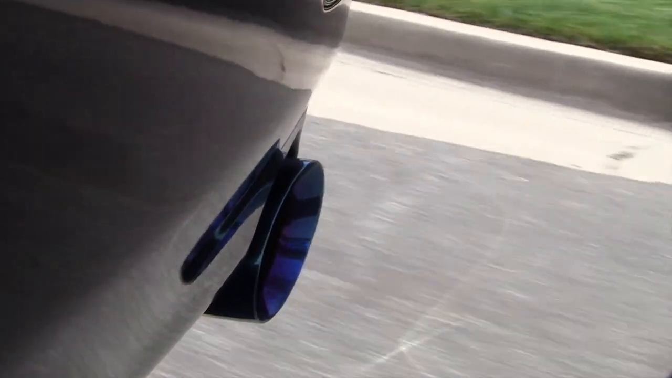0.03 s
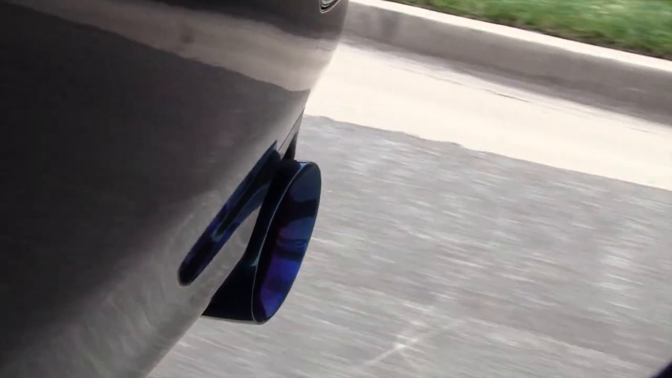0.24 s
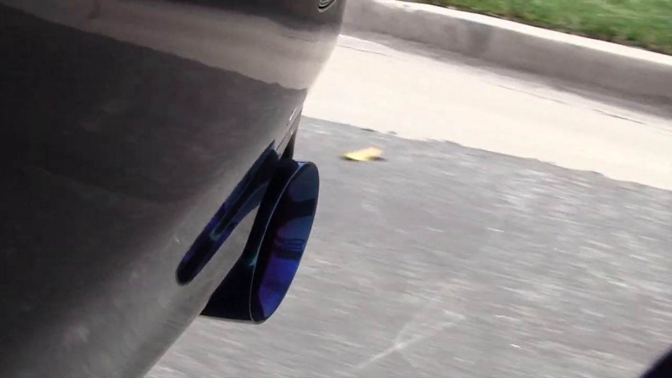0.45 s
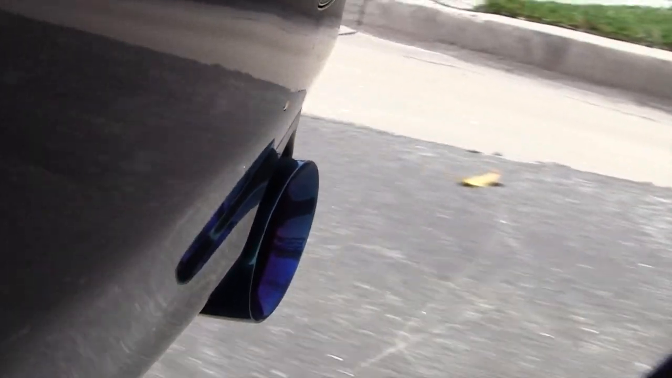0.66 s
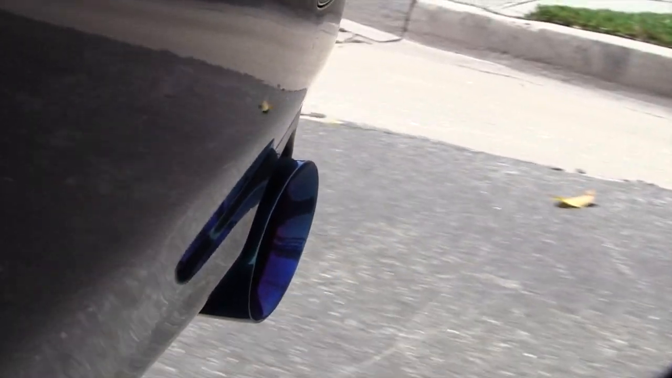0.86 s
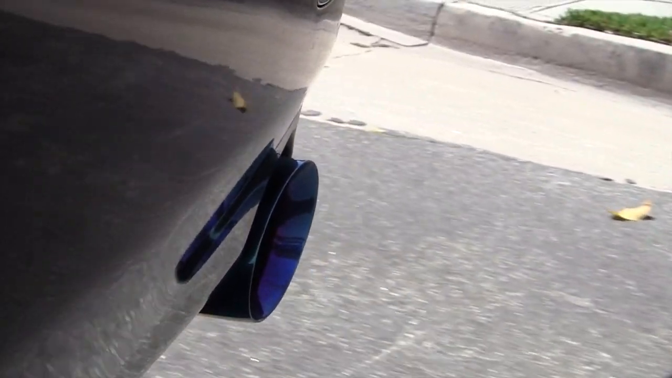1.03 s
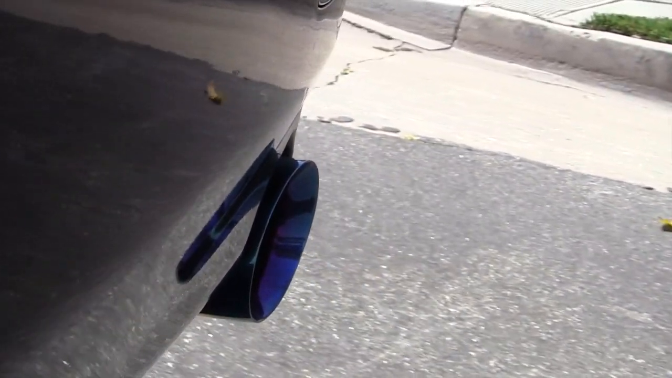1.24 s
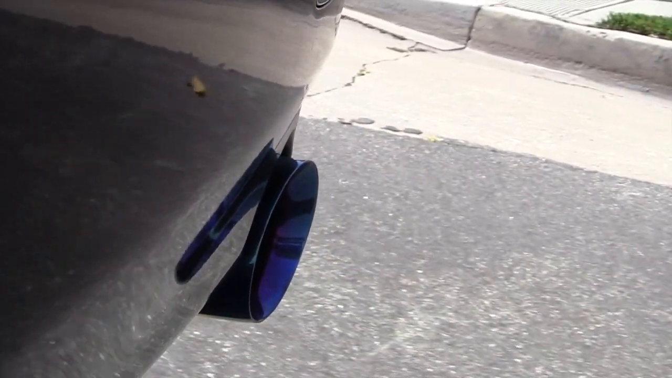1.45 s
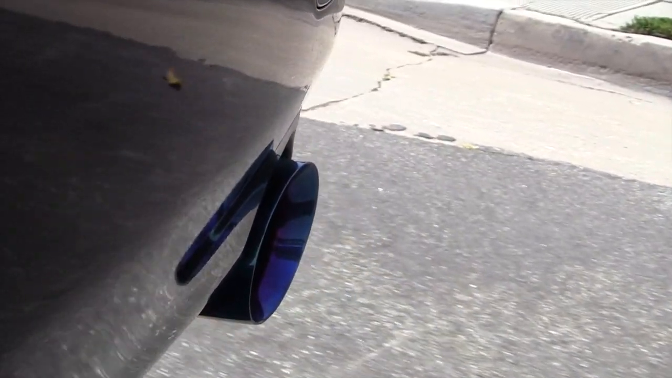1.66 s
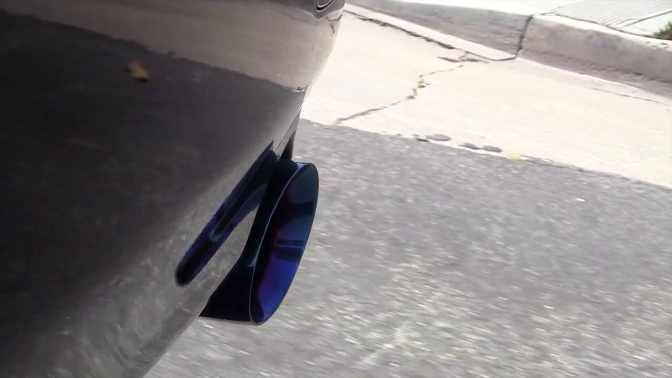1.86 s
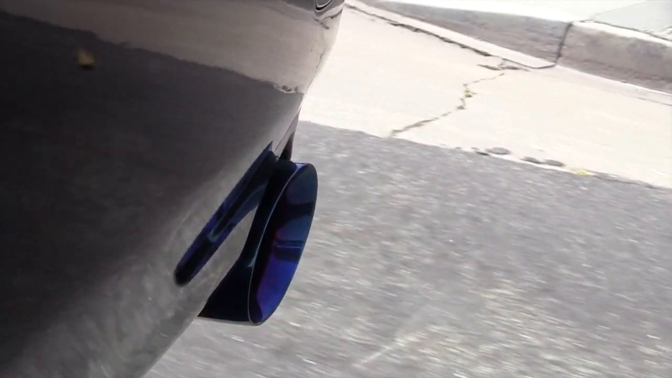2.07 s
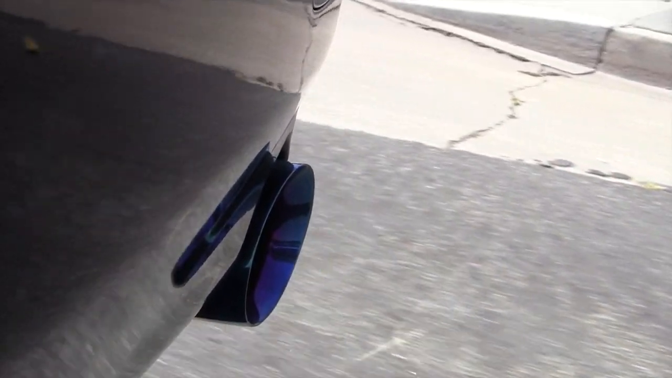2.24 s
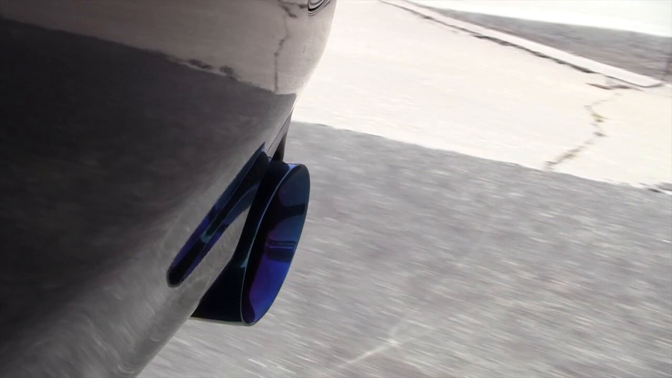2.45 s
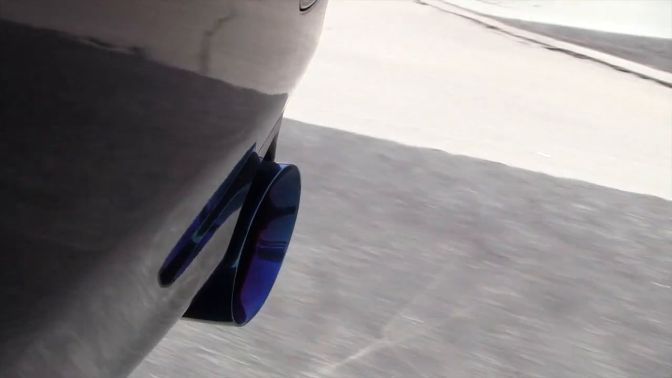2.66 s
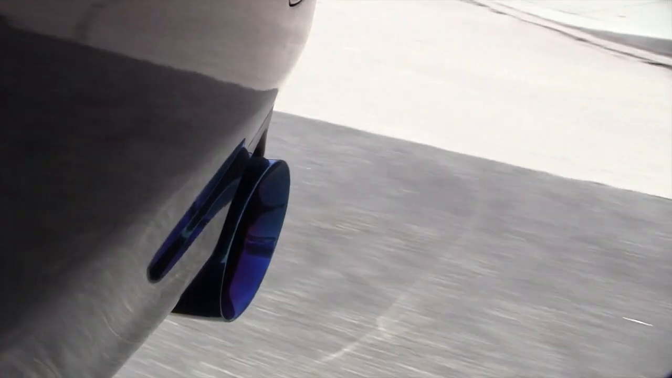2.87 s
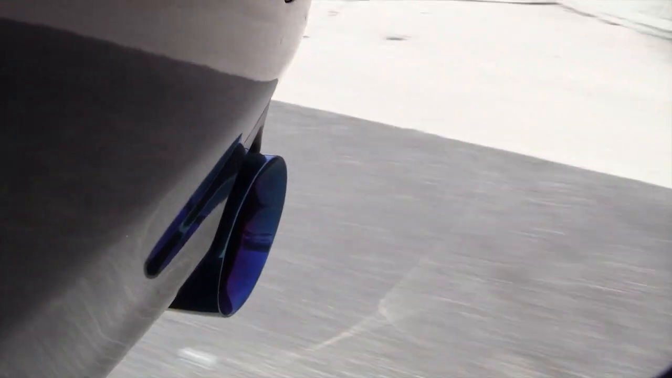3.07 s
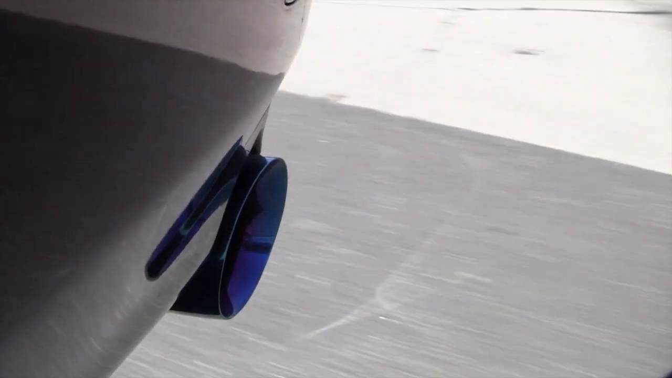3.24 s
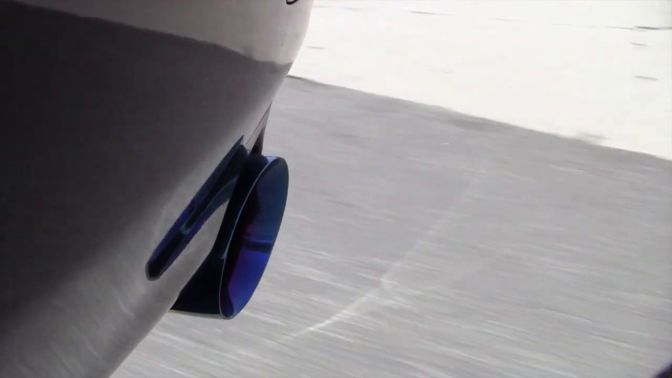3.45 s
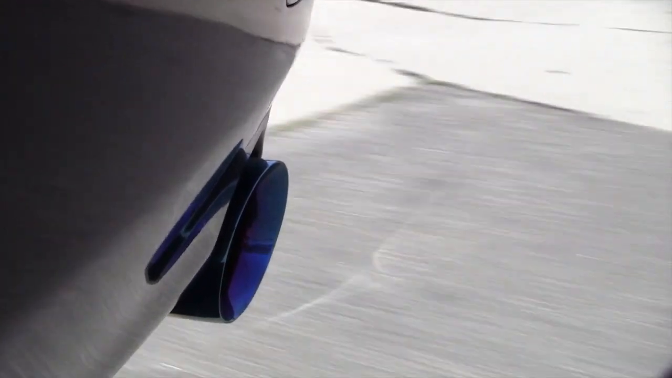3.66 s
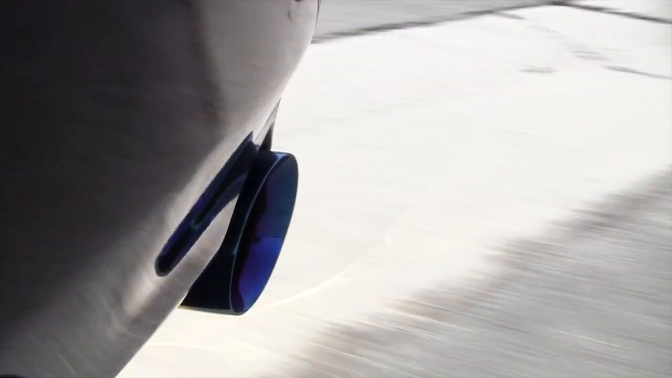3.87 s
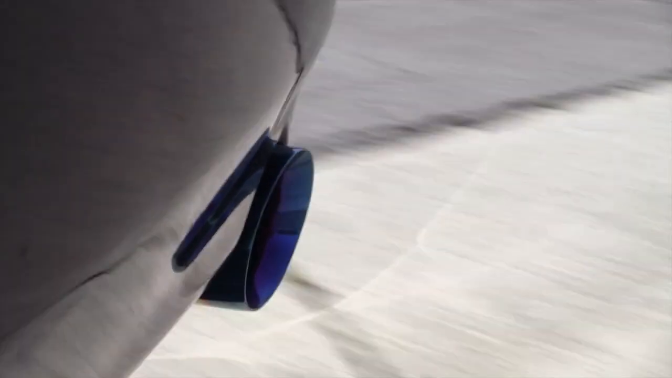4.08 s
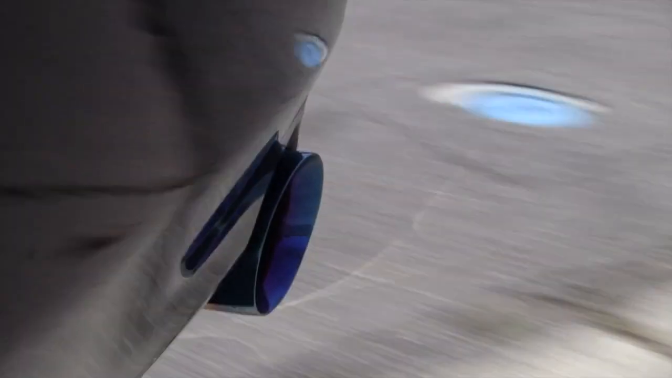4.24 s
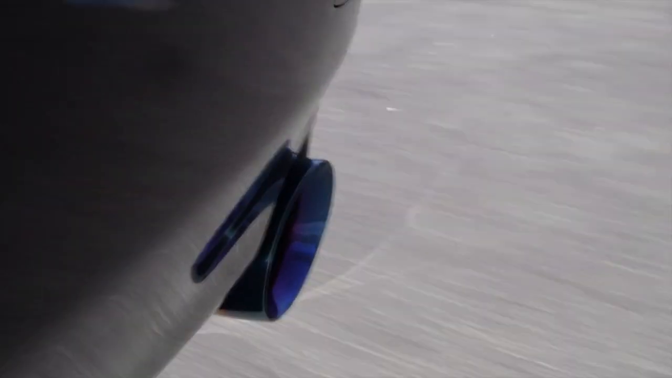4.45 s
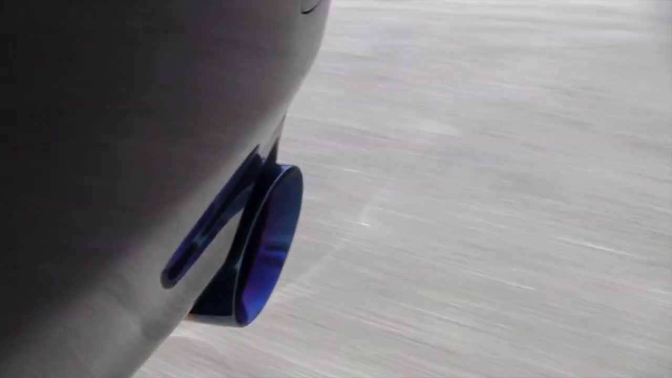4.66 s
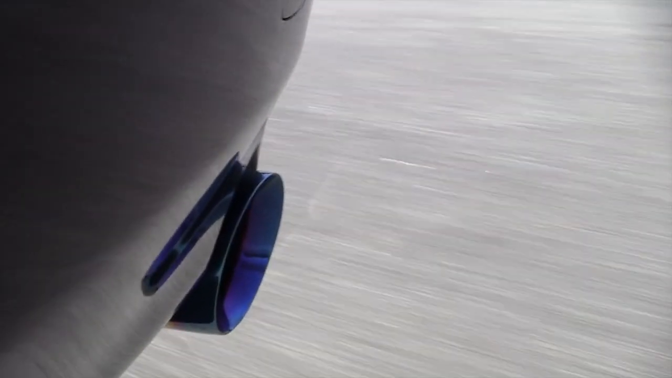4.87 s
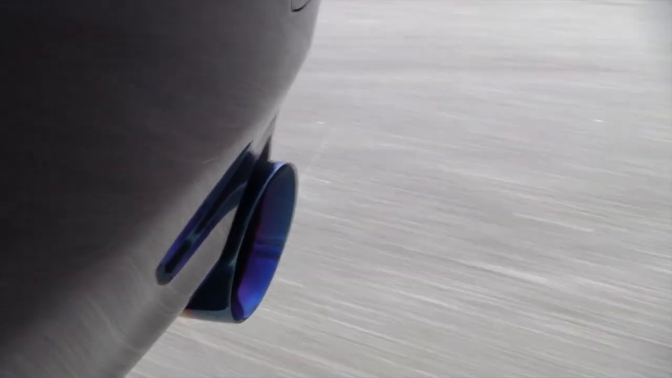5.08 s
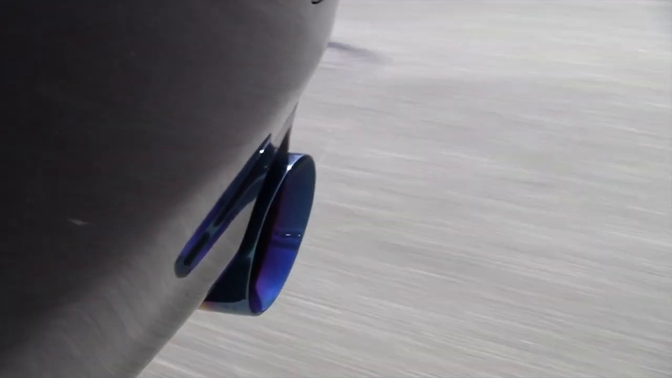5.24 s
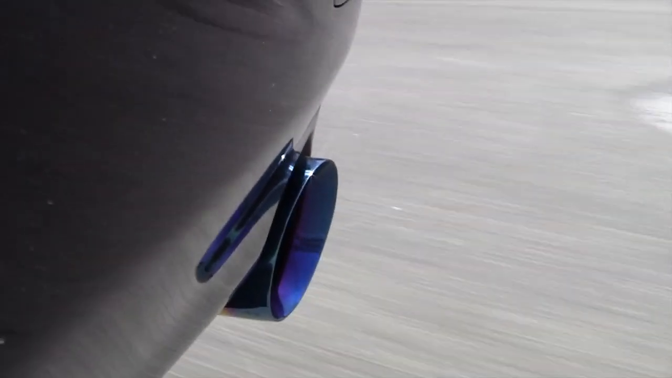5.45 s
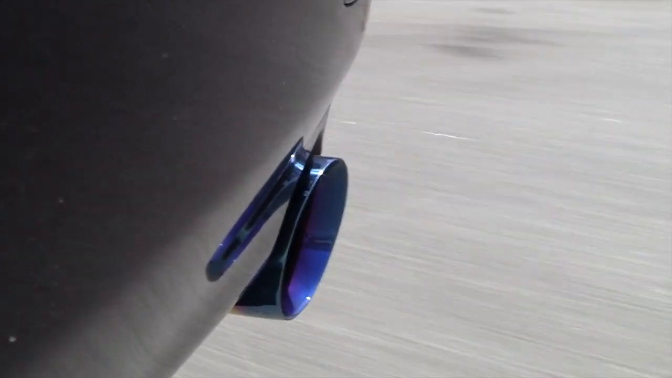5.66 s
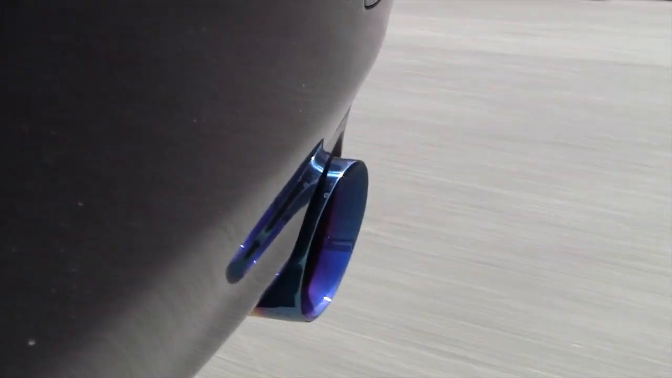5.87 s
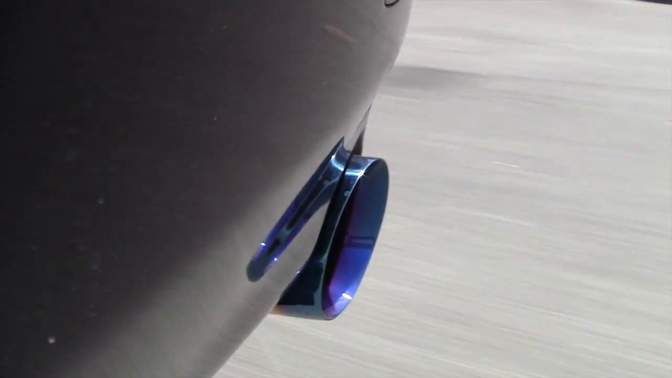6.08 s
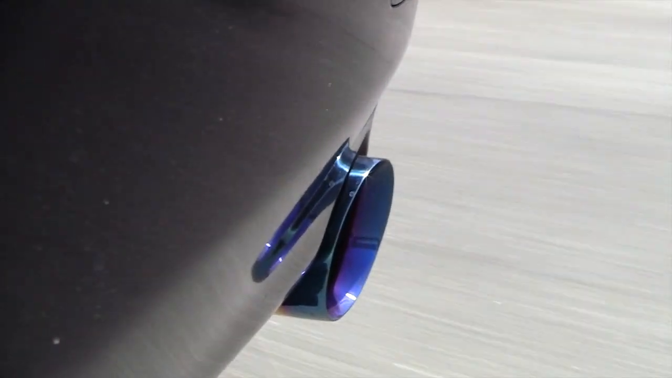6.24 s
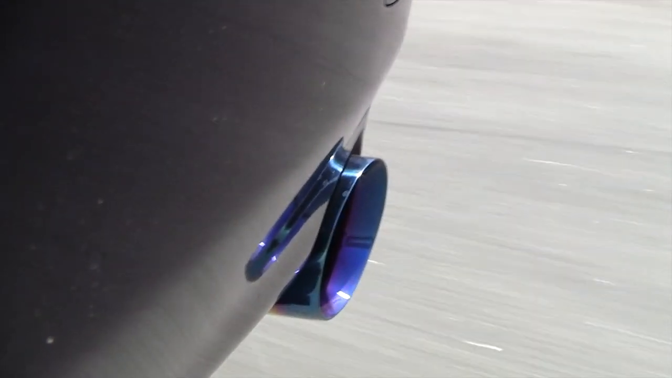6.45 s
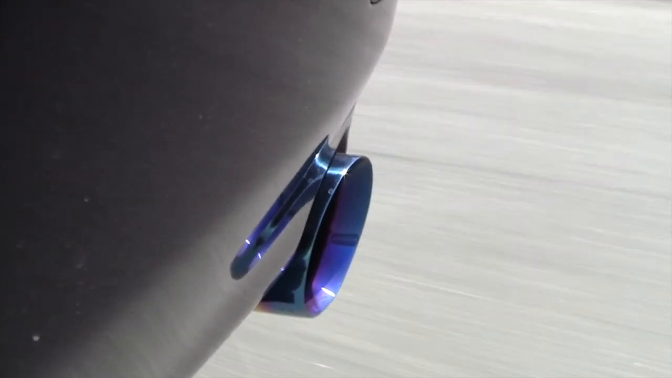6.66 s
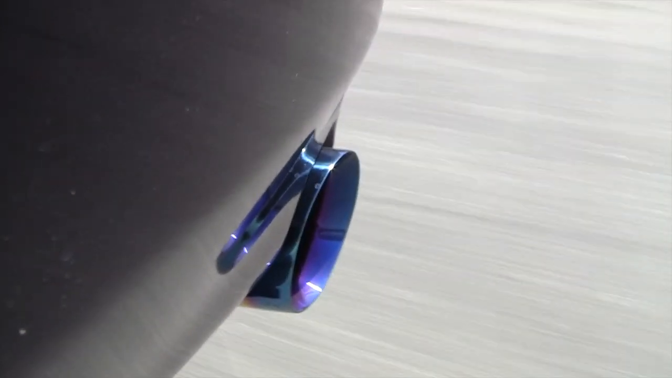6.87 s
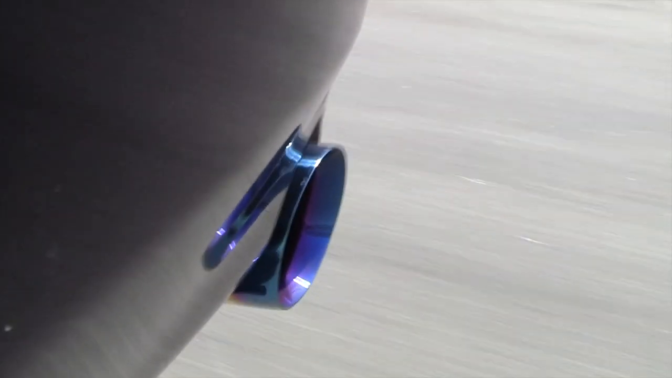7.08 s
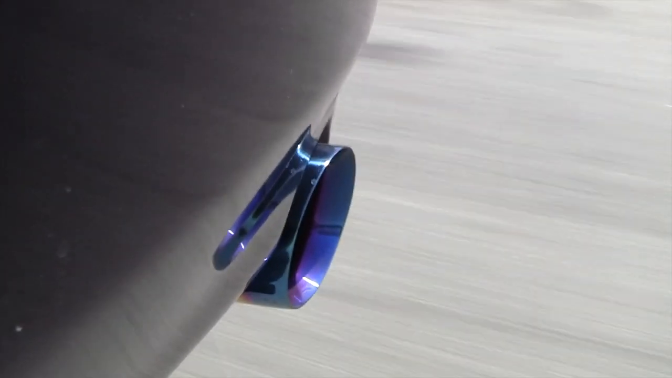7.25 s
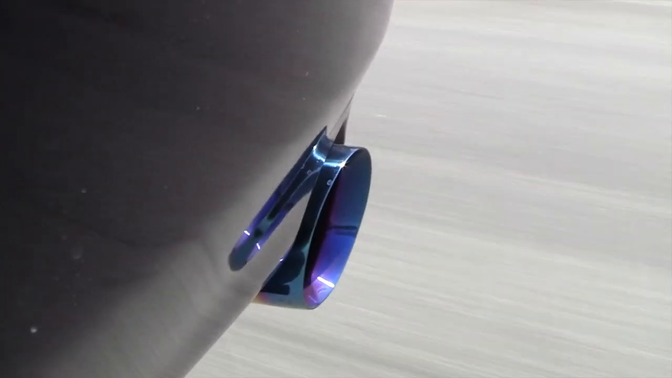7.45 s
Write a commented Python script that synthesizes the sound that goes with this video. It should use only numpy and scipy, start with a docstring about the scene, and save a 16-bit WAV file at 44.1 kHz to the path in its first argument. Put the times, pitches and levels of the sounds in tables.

```python
"""A V6 car on a street, heard from a microphone mounted right beside the tailpipe.
It coasts at first, a faint hum, a wheel ring and one squeak over the low throb of the exhaust.
From two seconds it pulls away hard: firings boom through the muffler and gas rushes from the tip.
Grit crunches under the tyres, and around four seconds they knock twice over a concrete gutter.
The tyre roar grows to the end, and the pipe rasps louder and more unevenly as the revs climb."""
import sys
import numpy as np
from scipy import signal
from scipy.io import wavfile
from scipy.ndimage import uniform_filter1d

SR = 44100
rng = np.random.default_rng(int(sys.argv[2]) if len(sys.argv) > 2 else 0)


def digitize_waveform(pressure):
    """Quantize a signal to 16-bit integers and store it at the path in sys.argv[1].

    Rows of a 2-D input are taken as channels; values are limited to [-1, 1].
    """
    field = np.atleast_2d(pressure).T
    bounded = np.clip(field, -1, 1)
    quanta = np.round(bounded * 32767).astype(np.int16)
    wavfile.write(sys.argv[1], SR, quanta)


N = 331191
TIME = np.arange(N) / SR

# The six cylinders in firing order. Each entry: relative strength in dB, scaled by the imbalance.
CYLINDERS_DB = [5, -3, -4, -5, 0, 7]


def from_db(db):
    """Decibels to gain."""
    return 10 ** (np.asarray(db) / 20)


def rms_one(x):
    """Scale to unit power."""
    return x / np.sqrt(np.mean(x ** 2) + 1e-20)


def in_time(rows):
    """Each column of a curve at every sample."""
    s, *columns = np.transpose(rows)
    return [np.interp(TIME, s, c) for c in columns]


def by_revs(rows, rate):
    """Read a curve at the given firing rate."""
    return np.interp(rate, *np.transpose(rows))


def at_hz(points, hz):
    """Read a spectrum on a log-frequency axis."""
    points_hz, db = np.transpose(points)
    return np.interp(np.log(hz), np.log(points_hz), db)


def swell(s, length_s):
    """A smooth rise and fall around one moment."""
    return np.exp(-.5 * np.minimum(((TIME - s) / length_s) ** 2, 100))


def drift(per_s):
    """A random wander, gliding to a new value per_s times a second."""
    knots = rng.standard_normal(4096)
    return np.interp(TIME * per_s, np.arange(len(knots)), knots)


def cut(x, hz, kind, order=2):
    """Butterworth filter."""
    sections = signal.butter(order, np.clip(hz, 10, .45 * SR), kind, fs=SR, output="sos")
    return signal.sosfilt(sections, x)


def resonate(x, hz, width_hz):
    """One resonance with gain 1 at its peak."""
    r = np.exp(-np.pi * width_hz / SR)
    feedback = [1, -2 * r * np.cos(2 * np.pi * hz / SR), r * r]
    return signal.lfilter(np.array([1, 0, -1]) * (1 - r * r) / 2, feedback, x + 1e-18)


def narrow_noise(hz, width_hz):
    """A wavering tone: noise twice through one resonance; rms 1."""
    return rms_one(resonate(resonate(rng.standard_normal(N), hz, width_hz), hz, width_hz))


def stereo_noise(spectrum, flicker_db):
    """Bands of noise, each with its own level, flicker, width and lean; rms 1 in the middle."""
    # Stereo width. Each row: frequency in Hz, side minus mid in dB.
    width = [(60, -8.5), (99, 0), (160, -4), (270, -7.5), (450, -7.5), (740, -9), (1220, 0), (2010, -3.5),
             (3330, -5.5), (5500, -11), (9080, -7), (15000, -25.5)]
    # Lean to one side. Each row: frequency in Hz, left minus right in dB.
    lean = [(60, -1), (99, 7), (160, -2.5), (270, 0.5), (450, 0), (740, -4), (1220, 6), (2010, 4.0),
            (3330, 4.5), (5500, 0.5), (9080, 3), (15000, -8)]
    out, edges = 0, np.geomspace(22, 16000, 25)
    sides = np.array([[1], [-1]])
    white = rng.standard_normal((2, 2, N))
    for k, (low, high) in enumerate(zip(edges, edges[1:])):
        hz, flicker = np.sqrt(low * high), drift(per_s=25)
        if spectrum[0][0] < high and low < spectrum[-1][0]:
            mid, side = cut(white[k % 2], [low, high], "band")
            pair = mid + sides * side * from_db(at_hz(width, hz))
            pair *= from_db(sides * at_hz(lean, hz) / 2)
            out = out + pair * from_db(at_hz(spectrum, hz) + flicker_db * flicker)
    return out / np.std(out.mean(axis=0))


def whines(mic_hiss_db=-69):
    """Thin tones, one squeak and a faint steady microphone hiss, soon buried under the exhaust."""
    # A hum and a sizzle. Each row: frequency in Hz, width in Hz, level in dB.
    thin_tones = [(345.6, 5.3, -53.5), (7650, 960, -68)]
    # A metallic ring on each wheel turn: frequency in Hz, width in Hz, level in dB, turns per second.
    wheel_ring = (3687, 50, -63.5, 7)
    # The squeak: time in seconds, frequency in Hz, level in dB, length in seconds.
    brief_squeak = (1.421, 2240, -42, .005)
    tones = sum(from_db(db) * narrow_noise(hz, width) for hz, width, db in thin_tones)
    hz, width, db, per_s = wheel_ring
    turning = np.cos(np.pi * per_s * TIME) ** 2
    wheel = from_db(db) * narrow_noise(hz, width) * turning * swell(1.2, .55)
    s, hz, db, length_s = brief_squeak
    squeak = from_db(db) * swell(s, length_s) * np.sin(2 * np.pi * hz * TIME)
    mic_hiss = from_db(mic_hiss_db) * rms_one(cut(rng.standard_normal(N), [7000, 13500], "band"))
    return tones + wheel + squeak + mic_hiss


def road(gusts, gust_share=0.12, ring_db=-8, ring_throb=0.23, throb_hz=10):
    """Tyre roar with one narrow, throbbing ring, and hiss; all flutter a little with the gusts."""
    # Tyre roar, then road hiss. Each row: time in seconds, relative level in dB.
    roar_levels = [(0, -42), (1.3, -44), (2.05, -42.5), (3, -39.5), (4.8, -36), (5.95, -38), (7.1, -31),
                   (7.51, -32)]
    hiss_levels = [(0, -54), (1.25, -61.5), (2.05, -61.5), (2.9, -53), (3.45, -53.5), (4.1, -47),
                   (4.9, -46), (5.9, -50.5), (7.1, -43), (7.51, -46)]
    # Their spectra. Each row: frequency in Hz, relative density in dB.
    roar_spectrum = [(100, 1), (300, 6), (400, 5.5), (620, -1.5), (850, -0.5), (1100, -1.5), (1600, -6.5),
                     (2100, -7), (2700, -16.5), (4000, -22.5), (8000, -46)]
    hiss_spectrum = [(1200, -16), (2500, 2), (3500, 4), (5000, 0), (6500, -4), (8000, -10), (9500, -15.5),
                     (12500, -18.5), (15500, -34.5)]
    (roar_db,), (hiss_db,) = in_time(roar_levels), in_time(hiss_levels)
    ring = from_db(ring_db) * narrow_noise(hz=1318, width_hz=100)
    ring *= np.interp(TIME, [1.8, 3, 5.4, 6.3], [0.27, 0.79, 0.62, 0.38])
    ring *= 1 + ring_throb * np.sin(2 * np.pi * throb_hz * TIME)
    roar = from_db(roar_db + 1.5) * (stereo_noise(roar_spectrum, flicker_db=1.5) + ring)
    hiss = from_db(hiss_db + 0.5) * stereo_noise(hiss_spectrum, flicker_db=1.85)
    return (roar + hiss) * (1 + gust_share * (gusts - 1))


def grit(rise_s=.005, t60_s=.06, grain_db=8, fine_from_s=2.6, fine_until_s=5.2, fine_per_s=18):
    """Each stone gives a grainy crunch with a bright tick; fine grit lies around the gutter."""
    # Larger stones under the tyres. Each row: time in seconds, relative crunch and tick levels in dB.
    stones = [(2.6294, -56, -56), (2.8489, -51, -70), (2.8973, -46.5, -68), (3.0594, -47.5, -67),
              (3.7644, -45.5, -38), (3.848, -43, -71), (3.952, -41, -42), (4.0057, -49, -40),
              (4.047, -33.5, -35), (4.1074, -45, -43), (4.146, -42, -66), (4.2358, -44.5, -60),
              (4.388, -50, -54), (4.5325, -36, -44), (4.6214, -42, -61), (5.0077, -39.5, -67),
              (5.6421, -40.5, -57)]
    times = fine_from_s + (np.arange(64) + rng.random(size=64)) / fine_per_s
    sizes_db = 3 * rng.standard_normal((len(times), 2)) + [-55, -63.5]   # crunch, tick
    fine = [(s, *db) for s, db in zip(times, sizes_db) if s < fine_until_s]
    age = TIME[:SR // 4]
    shape = np.minimum(age / rise_s, 1) * from_db(-60 * np.maximum(age - rise_s, 0) / t60_s)
    crunch, tick = np.zeros((2, N))
    for s, crunch_db, tick_db in list(stones) + fine:
        at = int((s - rise_s / 2) * SR)
        crunch[at:at + len(age)] += from_db(crunch_db + 4.5) * shape
        tick[at:at + len(age)] += from_db(tick_db + 1.5) * shape
    grains = rng.standard_normal(N) + 0.1 * rng.standard_normal((2, N))   # almost mono
    grains *= from_db(grain_db * rng.standard_normal(N))
    body = rms_one(cut(grains, [1500, 5500], "band"))
    treble = rms_one(cut(grains, [6400, 9200], "band", order=3))
    return crunch * body + tick * treble


def knocks(top_hz=6000):
    """Each tyre scuffs over the gutter edge for a few milliseconds and sets the underbody ringing."""
    # Tyres on the edge. Each row: time in seconds, level in dB, length in seconds.
    hits = [(4.050, -22, .004), (4.156, -26, .006)]
    # Wheel and underbody modes. Each row: frequency in Hz, width in Hz, relative level in dB.
    modes = [(1000, 100, -3), (1330, 90, -3), (1880, 120, 0), (2350, 160, -6), (2930, 220, -5)]
    push = sum(from_db(db) * swell(s, length_s) for s, db, length_s in hits)
    scuff = cut(rng.standard_normal(N) + .5 * rng.standard_normal((2, N)), top_hz, "low")
    return push * rms_one(sum(from_db(db) * resonate(scuff, hz, width) for hz, width, db in modes))


def rasp(firings, rate, strength, rough=0.25, low_hz=330, top_hz=1500):
    """The steep front of each pulse rings the tailpipe, with a puff of turbulence behind it."""
    # Tailpipe resonances. Each row: frequency in Hz, width in Hz, relative level in dB.
    modes = [(368, 33, 3.5), (537, 116, 0), (590, 57, 3), (706, 78, -9.5), (816, 33, -9), (1310, 57, -34)]
    fronts = np.diff(np.floor(firings), prepend=np.floor(firings[0]))
    puffs = rms_one(np.exp(-(firings % 1) / .3)) * rng.standard_normal(N) * np.sqrt(rate / SR)
    drive = strength * (fronts + rough * puffs)
    rings = sum((-1) ** k * from_db(db) * resonate(drive, hz, width)
                for k, (hz, width, db) in enumerate(modes))
    rings = cut(cut(rings, low_hz, "high", order=4), top_hz, "low", order=4)
    return rings / np.sqrt(uniform_filter1d(rings ** 2, size=8000) + 1e-12)   # held near rms 1


def boom(firings, rate, strength, muffler_hz=58, muffler_q=0.74):
    """The muffler rounds each firing into a few low harmonics and delays those above its resonance."""
    # The throttle. Each row: time in seconds, pulse strength in dB.
    throttle = [(0, -34), (0.58, -32), (0.86, -36.5), (1.38, -34), (1.85, -32), (2.12, -18), (2.6, -15),
                (3.08, -9.5), (4.15, -9.5), (5.7, -7), (7.51, -4)]
    # Pulses grow rounder with the revs. Each row is a harmonic: dB at low revs, dB at high revs.
    pulse = [(0.0, -1), (-3.5, -3), (-7, -6.5), (-7, -12.5), (-12.5, -38)]
    # The pulse changes shape between these two firing rates in Hz.
    rounding_hz = [43, 62]
    # Growl of unequal cylinders. Each row: multiple of the six-firing cycle rate, relative level in dB.
    growl_orders = [(9, -26), (11, -27.5), (13, -25.5)]
    # What the muffler lets through. Each row: frequency in Hz, gain in dB.
    muffler = [(28, -31), (42, -15), (60, -2.5), (90, -2), (128, 0.5), (170, -3.5), (215, -6.5), (265, -17),
               (315, -31.5), (345, -65.5)]
    throttle_db, = in_time(throttle)
    harmonics = [(k, np.interp(rate, rounding_hz, shape_db)) for k, shape_db in enumerate(pulse, 1)]
    growl = [(multiple / len(CYLINDERS_DB), db) for multiple, db in growl_orders]
    out = 0
    for k, db in harmonics + growl:
        hz = k * rate
        lag = 2 * np.arctan(muffler_q * (hz / muffler_hz - muffler_hz / hz))
        gain = from_db(throttle_db + db + at_hz(muffler, hz))
        out = out - gain * np.sin(2 * np.pi * k * firings - lag)
    return np.sqrt(2) * out * strength


def exhaust(throb=.35, boom_share=.2, gust_share=0.17, rasp_scatter_db=.7, crank_db=-42):
    """Six cylinders fire in turn; each firing booms, rasps and pushes out a gust of gas."""
    # Engine speed. Each row: time in seconds, firings per second.
    revs = [(0.0, 36.65), (0.48, 35.68), (0.78, 27.8), (1.25, 29.28), (1.6, 30.95), (1.94, 30.35),
            (2.33, 44.46), (2.75, 52.41), (3.17, 63.54), (3.7, 68.72), (4.15, 74.13), (4.45, 85.03),
            (4.8, 92.47), (5.25, 107.68), (5.8, 130.49), (6.3, 153.66), (6.8, 176.79), (7.2, 194.44),
            (7.51, 206.31)]
    # Flow through the tailpipe. Each row: time in seconds, rasp level in dB, gas rush level in dB.
    flow = [(0, -73, -39.5), (.8, -66, -50.5), (1.8, -63, -44), (3, -48, -32), (4.4, -42, -28.5),
            (5.1, -41, -26.5), (5.38, -29, -26.5), (5.8, -27.5, -30), (6.15, -36.5, -27.5),
            (7.2, -20.5, -24), (7.51, -21, -29)]
    # Cylinders grow more unequal with the revs. Each row: firings per second, factor on CYLINDERS_DB.
    imbalances = [(60, 0.42), (140, 0.65), (195, 1.33)]
    # Combustion steadies with the revs. Each row: firings per second, scatter between firings in dB.
    scatter = [(30, 3), (55, 0.5), (100, 0.05)]
    # Brief surges at low revs. Each row: time in seconds, extra boom in dB, length in seconds.
    surges = [(1.525, 5, 0.043), (1.69, 5, 0.015)]
    # Gas leaving the tip. Each row: frequency in Hz, relative density in dB.
    rush_spectrum = [(25, -25.5), (60, -23.5), (95, -14), (140, 2.5), (240, 0.5), (320, -14.5),
                     (450, -13.5), (650, -33), (1000, -38), (2000, -54)]
    rate, = in_time(revs)
    rasp_db, rush_db = in_time(flow)
    imbalance, scatter_db = by_revs(imbalances, rate), by_revs(scatter, rate)
    firings = np.cumsum(rate) / SR
    front = firings + .6   # the steep front comes ahead of the pressure peak
    index = np.arange(1024)
    boom_luck, rasp_luck = (np.interp(front, index, luck) for luck in rng.standard_normal((1024, 2)).T)
    pattern_db = np.array(CYLINDERS_DB)[index % len(CYLINDERS_DB)]
    uneven_db = imbalance * np.interp(front, index, pattern_db)

    boom_db = boom_share * uneven_db + scatter_db * boom_luck   # the muffler evens the firings out
    boom_db += sum(db * swell(s, length_s) for s, db, length_s in surges)
    # Unequal cylinders also pulse once per crank turn, every third firing.
    crank = from_db(crank_db) * imbalance ** 3 * np.cos(2 * np.pi * firings / 3)
    low = (boom(firings, rate, from_db(boom_db)) + crank) * from_db([[.35], [-.35]])   # a touch left
    front_db = uneven_db + rasp_scatter_db * rasp_luck
    bark = from_db(rasp_db) * rasp(front, rate, from_db(front_db)) * from_db([[-.4], [.4]])
    gusts = (1 + throb * np.cos(2 * np.pi * front)) * from_db(gust_share * uneven_db)
    rush = from_db(rush_db) * stereo_noise(rush_spectrum, flicker_db=-1.0) * gusts
    return low + bark + rush, gusts


def scene():
    """Exhaust close to the microphone, road noise all around."""
    tailpipe, gusts = exhaust()
    return tailpipe + road(gusts) + whines() + grit() + knocks()


def record(dry, cutoff_hz=15600):
    """The top of the treble is cut steeply."""
    return signal.sosfilt(signal.ellip(10, .1, 80, cutoff_hz, fs=SR, output="sos"), dry)


dry = scene()
out = record(dry)
digitize_waveform(out)
```